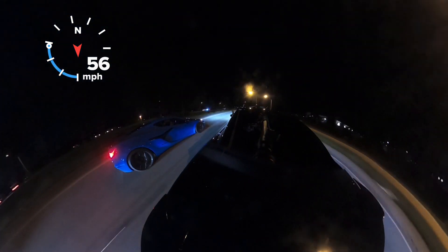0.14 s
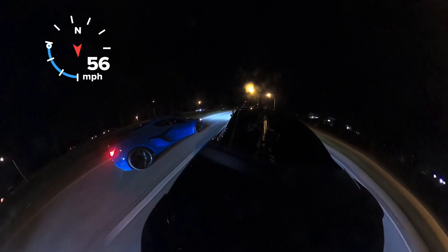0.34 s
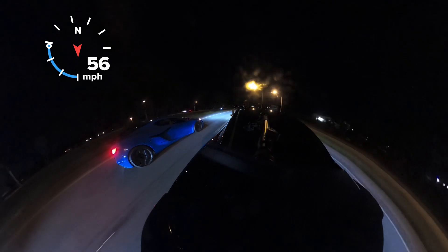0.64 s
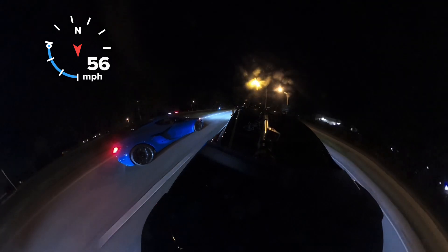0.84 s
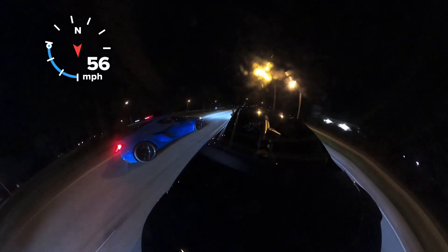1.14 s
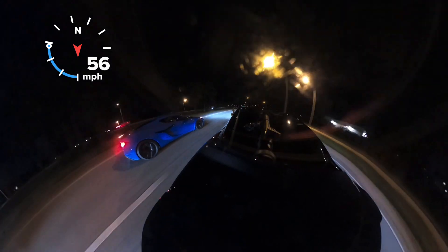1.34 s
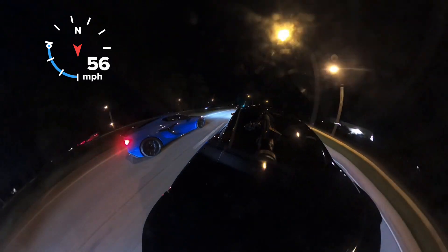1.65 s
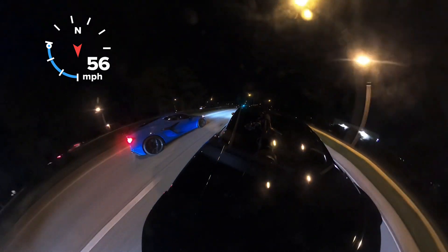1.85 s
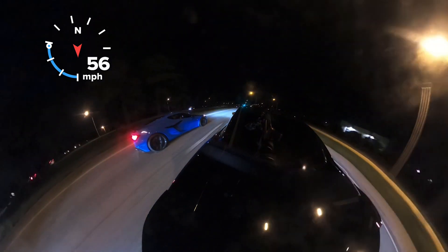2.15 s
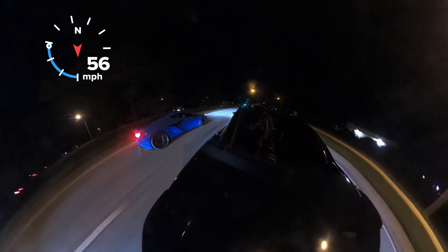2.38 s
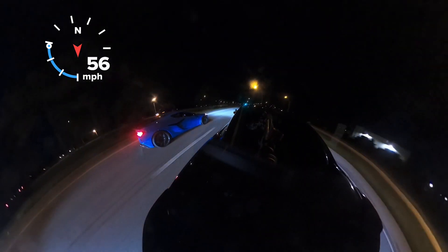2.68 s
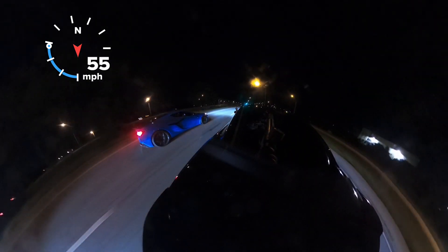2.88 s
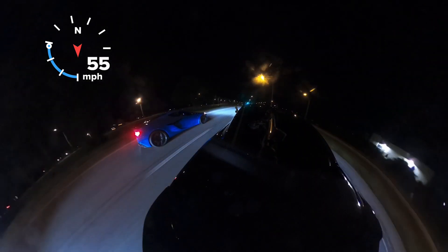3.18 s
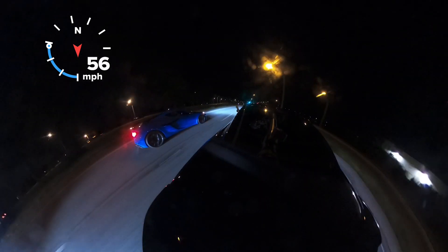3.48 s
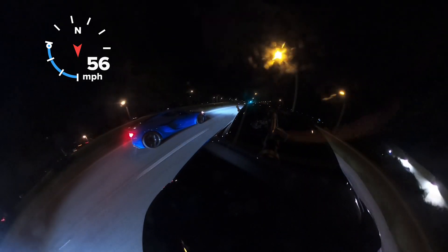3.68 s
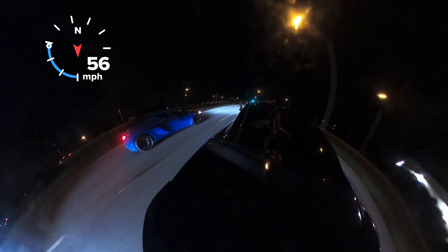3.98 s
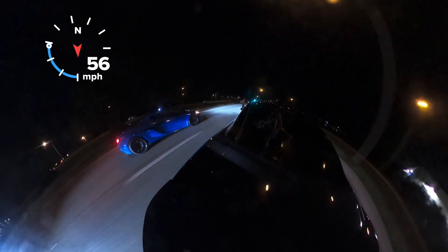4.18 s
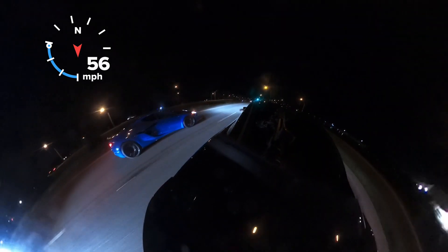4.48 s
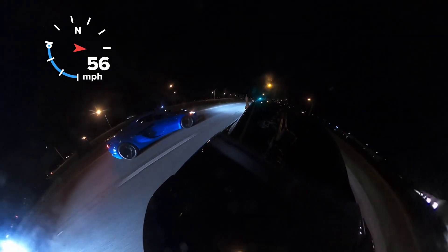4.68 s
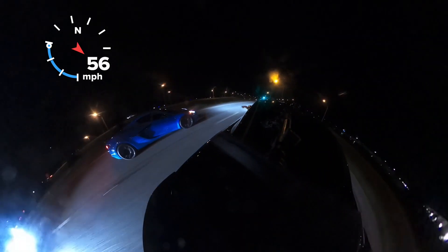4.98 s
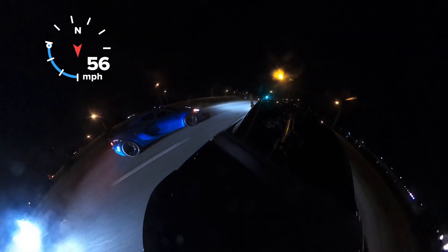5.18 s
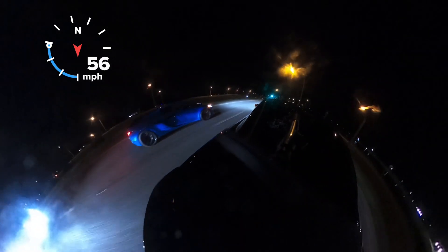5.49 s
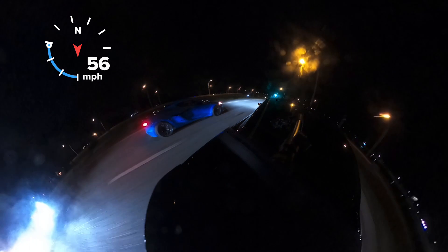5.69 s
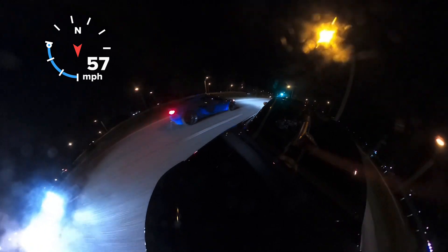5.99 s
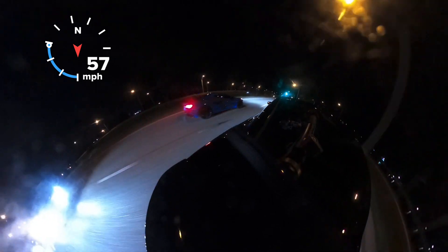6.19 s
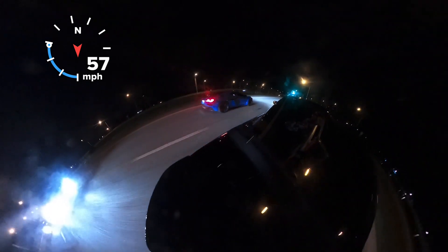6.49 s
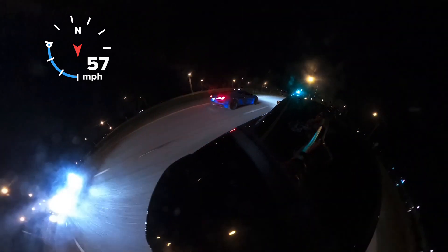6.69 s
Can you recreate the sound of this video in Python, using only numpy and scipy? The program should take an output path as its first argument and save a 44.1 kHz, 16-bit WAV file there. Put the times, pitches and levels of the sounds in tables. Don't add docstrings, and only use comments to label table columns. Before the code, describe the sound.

Gusty highway wind with tearing puffs and slaps, a brief engine blip, a faint held note, then a sports car's loud, raspy V8 acceleration.

```python
import sys
import numpy as np
from scipy import signal
from scipy.fft import rfft, irfft, next_fast_len
from scipy.io import wavfile
from scipy.ndimage import uniform_filter1d

SR = 44100
rng = np.random.default_rng(int(sys.argv[2]) if len(sys.argv) > 2 else 0)


def decibels_to_gain(level_db):
    exponent = np.asarray(level_db, float) / 20
    return 10 ** exponent


def wav_out(sig):
    wavfile.write(sys.argv[1], SR, np.round(np.clip(np.atleast_2d(sig).T, -1, 1) * 32767).astype(np.int16))


N = 301644
THROTTLE_S, CRACK_S = 5.42, 0.07

# frequency_hz, level_db (per Hz)
HISS_COLOUR = [(700, -6.5), (1100, -8), (1600, -11), (2500, -16.5), (3500, -19.5), (5000, -26.5),
               (7000, -36), (8300, -44), (10000, -52), (12000, -61), (14000, -70.5), (15500, -87.5)]


def rms_one(x):
    return x / np.sqrt(np.mean(x ** 2) + 1e-20)


def in_time(rows):
    s, *columns = np.transpose(rows)
    return [np.interp(np.arange(N) / SR, s, c) for c in columns]


def at_hz(points, hz):
    table_hz, table_db = np.transpose(points)
    return np.interp(np.log(hz), np.log(table_hz), table_db)


def ramp(start_s, length_s):
    return np.clip((np.arange(N) / SR - start_s) / length_s, 0, 1)


def bells(events, half_s):
    t = np.arange(0, N / SR + 0.01, 0.002)
    curve_db = sum(db * np.exp(-((t - s) / half_s) ** 2) for s, db in events)
    return np.interp(np.arange(N) / SR, t, curve_db)


def drift(rate, size=N):
    r = np.exp(-32 * np.pi * rate / SR)
    noise = rng.standard_normal(size // 16 + 3002)
    slow = signal.lfilter([1], [1, -2 * r, r * r], noise)[3000:]
    return np.interp(np.arange(size) / 16, np.arange(len(slow)), rms_one(slow))


def coloured(x, spectrum):
    size = next_fast_len(len(x))
    hz = np.maximum(np.arange(size // 2 + 1) * SR / size, 1)
    edge = np.minimum(hz / spectrum[0][0], 1) ** 4 * np.minimum(spectrum[-1][0] / hz, 1) ** 8
    return rms_one(irfft(rfft(x, size) * decibels_to_gain(at_hz(spectrum, hz)) * edge, size)[:len(x)])


def above(x, hz):
    return signal.sosfiltfilt(signal.butter(3, hz, "high", fs=SR, output="sos"), x)


def band_rms(x, low_hz, high_hz):
    band = signal.sosfilt(signal.butter(4, [low_hz, high_hz], "band", fs=SR, output="sos"), x)
    return x / np.sqrt(np.mean(band ** 2))


def note(turns, wobble_db, wobble_turns, rate):
    height, shift = drift(rate, size=len(turns)), drift(rate, size=len(turns))
    return np.sqrt(2) * decibels_to_gain(wobble_db * height) * np.sin(2 * np.pi * (turns + wobble_turns * shift))


def v8_load():
    roar_lag_s, fill_s = 0.018, 0.14
    shut_db = -42 * (1 - ramp(THROTTLE_S, CRACK_S)) ** 2.8
    missing = 1 - ramp(THROTTLE_S + CRACK_S, fill_s)
    swell_db = 1.5 * (ramp(THROTTLE_S, 2.2) * 2 - 0.5)
    exhaust_db = -21 + shut_db - 1.5 * missing + swell_db
    roar_db = -42.5 + np.roll(shut_db, int(roar_lag_s * SR)) + 2 * missing + swell_db
    top_db = 2 - 13 * missing
    return exhaust_db, roar_db, top_db


def v8_orders(turns, cycle_hz):
    # frequency_hz, level_db
    pipe = [(400, -11), (560, -6), (700, -3.5), (900, -5), (1050, -13.5), (1200, -23), (1350, -22.5),
            (1540, -16.5), (1750, -23.5), (2000, -24), (2300, -21), (2700, -27), (3400, -40)]
    # start_s, level_db
    firing = [(5.5, -27), (5.75, -26), (6.0, -22), (6.25, -24.5), (6.5, -25), (6.84, -26)]
    # order (multiple of cycle), level_db, growth_db_per_s
    strong_orders = [(9, -23, -2), (10, -24, 5), (11, -19, -6), (12, -25, 3), (13, -22, 6), (14, -25, 4),
                     (15, -25, 3), (16, -30, -16), (17, -27, 4), (18, -18, 1.5), (19, -21.5, -7),
                     (20, -20.5, -7), (21, -21, 2), (22, -20.5, 0), (23, -28, 1), (24, -29, -2),
                     (25, -23.5, -6), (26, -18, 3), (27, -23, 5), (28, -30, -3), (29, -20.5, -7),
                     (30, -23, -2), (31, -25, 3), (33, -30, -24), (34, -21, 1), (35, -22, 0), (36, -21, 5),
                     (37, -19, -6), (39, -20, 2), (40, -28, -9), (41, -25, 0), (42, -15, -3), (45, -23, -9),
                     (46, -21, 3), (47, -21, -4), (48, -26, -4), (51, -24, -10), (53, -24, -2),
                     (54, -24, -2), (55, -25, -4), (58, -20, -4), (59, -28, -10), (60, -26, 0),
                     (61, -25, -4), (62, -25, -2), (66, -27, -6), (76, -25, -12), (78, -24, -14)]
    strong = {order: (db, growth) for order, db, growth in strong_orders}
    start = int(THROTTLE_S * SR)
    firm_s, mid_pull_s = 5.75, 6.2
    since_s = np.maximum(np.arange(start, N) / SR, firm_s) - mid_pull_s
    unfilled = 1 - ramp(THROTTLE_S + CRACK_S, 0.22)[start:]
    late_db = -4 * unfilled ** 0.5
    blur_db = -5 * unfilled
    bite_s, bite_hz, bite_width_hz = 0.1, 770, 45
    biting = 1 - ramp(THROTTLE_S + CRACK_S + bite_s / 2, bite_s)[start:]
    tones = decibels_to_gain(in_time(firing)[0][start:]) * note(8 * turns, 1.5, 0.04, 5.0)
    for order in range(9, 81):
        hz, lowest_hz = order * cycle_hz, order * cycle_hz.min()
        weak = (-29 + 2 * rng.standard_normal(), -3)
        level_db, growth = strong.get(order, weak)
        lag = (order % 2) / 4 + 0.1 * rng.standard_normal()
        lag = lag + biting * ((0.07 * order ** 2) % 1 - 0.5)
        level_db = level_db + 4.5 * biting * np.exp(-((hz - bite_hz) / bite_width_hz) ** 2)
        level_db = level_db + at_hz(pipe, hz) + growth * since_s
        level_db = level_db + late_db * (lowest_hz < 740 * 0.9) + blur_db * (lowest_hz > 810)
        tones = tones + decibels_to_gain(level_db) * note(order * turns + lag, 1.2, 0.02, 3.0)
    return tones


def v8_roar(turns, top_db, gate=0.46, sharp=0.6):
    # frequency_hz, level_db (per Hz)
    roar_colour = [(300, -8), (650, -3), (950, -6.5), (1230, -16), (1520, -12.5), (1800, -18), (2200, -20),
                   (2500, -23.5), (2800, -24), (3600, -28), (5000, -34), (7500, -38), (8700, -46),
                   (11000, -52), (14500, -74)]
    size = len(turns)
    pulses = (0.5 + 0.5 * np.cos(2 * np.pi * 8 * turns)) ** sharp
    uneven = rms_one(pulses * decibels_to_gain(4 * drift(80.0, size)))
    puffed = 1 - gate + gate * uneven
    roar = band_rms(coloured(rng.standard_normal(size) * puffed, roar_colour), 3000, 9000)
    return roar + (decibels_to_gain(top_db) - 1) * above(roar, 8000)


def v8_pull():
    # start_s, cycle_hz (four-stroke cycles per s)
    speed = [
        (5.455, 31.8),
        (5.53, 34.7),
        (5.68, 34.45),
        (5.824, 35.4),
        (6.006, 37.3),
        (6.138, 38.1),
        (6.402, 40.5),
        (6.76, 43.3),
        (6.84, 43.8),
    ]
    start = int(THROTTLE_S * SR)
    cycle_hz = in_time(speed)[0][start:]
    exhaust_db, roar_db, top_db = (c[start:] for c in v8_load())
    shake = 3 - 2 * ramp(THROTTLE_S, 0.25)[start:]
    turns = np.cumsum(cycle_hz) / SR + 0.001 * drift(12.0, len(cycle_hz)) * shake
    tones, roar = v8_orders(turns, cycle_hz), v8_roar(turns, top_db)
    return np.r_[np.zeros(start), decibels_to_gain(exhaust_db + 18) * tones + decibels_to_gain(roar_db - 1.5) * roar]


def v8_cruise():
    # start_s, pitch_hz, level_db
    blip = [
        (2.9, 210, -50),
        (3.03, 236, -24),
        (3.11, 276, -31),
        (3.18, 299, -23),
        (3.265, 329, -22.5),
        (3.4, 407, -23),
        (3.435, 423, -26),
        (3.5, 425, -50),
    ]
    # start_s, pitch_hz, level_db
    held = [
        (3.6, 253, -50),
        (3.8, 254, -30),
        (4.0, 254, -27),
        (4.55, 256, -28),
        (4.8, 262, -28),
        (5.35, 256, -29),
        (5.42, 250, -25),
        (5.5, 274, -25),
        (5.62, 277, -27),
        (5.7, 277, -50),
    ]
    # multiple (of the firing note), level_db
    held_orders = [(.75, -3), (1., 0)]
    out = 0
    for curve, orders in ((blip, [(0.5, -7), (1, -1.7)]), (held, held_orders)):
        hz, level_db = in_time(curve)
        turns = np.cumsum(hz) / SR
        for k, db in orders:
            out = out + decibels_to_gain(level_db + db) * (level_db > -50) * note(k * turns, 1.5, 0.04, 5.0)
    return out


def own_exhaust():
    # start_s, pitch_hz, level_db
    low_gear = [(4.9, 470, -50), (5.02, 477, -27), (5.12, 476, -28), (5.46, 520, -27), (5.53, 526, -40),
                (5.64, 540, -40), (5.72, 548, -26), (5.88, 540, -25), (5.94, 540, -60)]
    # start_s, pitch_hz, level_db
    high_gear = [(5.94, 462, -60), (6.0, 452, -27), (6.1, 425, -24), (6.2, 410, -27), (6.3, 421, -24),
                 (6.5, 431, -24.5), (6.7, 436, -29), (6.84, 446, -23)]
    # multiple (of that pitch), level_db
    own_orders = [(.5, -2), (1., 0), (1.5, -9)]
    out = 0
    for hz, level_db in (in_time(low_gear), in_time(high_gear)):
        turns = np.cumsum(hz) / SR
        engine = sum(decibels_to_gain(db) * note(k * turns, 2.5, 0.05, 7.0) for k, db in own_orders)
        out = out + decibels_to_gain(level_db) * engine
    return out


def rasp():
    # frequency_hz, level_db (per Hz)
    rasp_colour = [(1000, -15), (1450, -5), (1750, 4), (2100, -2.5), (2700, -26)]
    # centre_s, rise_db
    swells = [(.67, 8), (1.85, 8), (2.68, 11), (2.9, 10), (3.31, 13.5), (3.46, 8.5), (3.9, 8), (4.8, 10.5),
              (5.3, 9)]
    level_db = -57 + bells(swells, half_s=0.09)
    return decibels_to_gain(level_db) * coloured(rng.standard_normal(N), rasp_colour)


def buffet(squeeze=0.5, hold_s=0.035):
    # frequency_hz, level_db (per Hz)
    buffet_colour = [(8.8, -35.5), (15, -8), (59, 0.5), (123, -0.5), (161, -9), (200, -10), (260, -14),
                     (340, -25), (570, -120)]
    # centre_s, rise_db (of the part above 105 Hz)
    lump_changes = [(.2, -1.5), (1.2, -2.5), (1.9, 0.5), (2.4, 1), (3.1, 1.5), (3.5, 4), (3.9, 1),
                    (4.9, -0.5), (5.7, 0), (6.3, 0), (6.7, 2)]
    lumps = coloured(rng.standard_normal(N), buffet_colour)
    small, shift_db = above(lumps, 105), bells(lump_changes, half_s=0.2)
    lumps = small * decibels_to_gain(shift_db) + (lumps - small) * decibels_to_gain(-0.4 * shift_db)
    height = np.sqrt(uniform_filter1d(lumps ** 2, int(hold_s * SR)) + 0.05)
    return decibels_to_gain(-13.5 + drift(9.9)) * rms_one(lumps / height ** squeeze)


def stream(gust_db=0.5, eddy_db=3.0, rush_share=0.14, fine_db=2.0):
    # frequency_hz, level_db (per Hz)
    rush_colour = [(100, -25.5), (170, -3.5), (274, -6.5), (307, -0.5), (340, -5.5), (443, -7.5),
                   (554, -11.5), (669, -12), (1600, -30), (2080, -63.5), (3520, -120)]
    # start_s, level_db
    gust = [(0.04, -49), (0.19, -49), (0.91, -51.5), (1.34, -51), (1.46, -50.5), (1.9, -50.5), (2.77, -54),
            (3.68, -50.5), (3.83, -50.5), (4.1, -50), (4.42, -53), (4.86, -49.5), (5.21, -49.5),
            (5.42, -50)]
    # centre_s, rise_db
    eddies = [(.1, 1), (.35, 2.5), (.5, -0.5), (.78, 0.5), (1.4, 1.5), (1.58, -1.5), (1.85, 3.5),
              (2.24, -3.5), (2.47, 2.5), (2.58, -2), (2.68, 4.5), (2.79, -1.5), (2.88, 2.5), (2.99, 1.5),
              (3.1, 4.5), (3.21, -0.5), (3.32, 1), (3.45, 2.5), (3.57, -3), (3.88, 0.5), (4.25, -0.5),
              (4.35, -1.5), (4.48, -1), (4.58, 2.5), (4.8, 2), (5.13, -2)]
    # centre_s, rise_db
    wake = [(.5, -3.5), (1.05, 3), (1.35, 2.5), (2.4, -1), (3.4, 2.5), (3.8, 3), (4.15, 1), (4.85, -2),
            (5.3, -2.5)]
    # start_s, level_db
    duck = [(5.44, 0), (5.56, -3.5)]
    large_db = bells(eddies, half_s=0.039)
    hiss_db = in_time(gust)[0] + large_db
    nearing_db = 0.63 * THROTTLE_S * ramp(0, THROTTLE_S)
    rush_db = -27 + nearing_db + 0.55 * (hiss_db - hiss_db.mean()) + in_time(duck)[0]
    eddies_db = gust_db * drift(11.0) + eddy_db * drift(99.0)

    rush = coloured(rng.standard_normal(N) * decibels_to_gain(rush_share * eddies_db), rush_colour)
    rush = rush + (rush - above(rush, 380)) * (decibels_to_gain(bells(wake, half_s=0.18)) - 1)

    white = rng.standard_normal(N)
    other_db = 0.7 * eddies_db + 0.6 * np.roll(eddies_db, N // 3)
    hiss = coloured(white * decibels_to_gain(eddies_db), HISS_COLOUR)
    other = coloured(white * decibels_to_gain(other_db), HISS_COLOUR)
    hiss = hiss + above(other - hiss, 2900)
    fine = above(hiss, 4700)
    hiss = hiss - fine + fine * decibels_to_gain(0.5 * fine_db * drift(25.0) - 0.5 * large_db - 1.0)
    hiss = hiss + above(hiss, 11500) * (decibels_to_gain(8.8 * drift(12.0) - 3.0) - 1)
    return decibels_to_gain(rush_db + 2.0) * band_rms(rush, 200, 900) + decibels_to_gain(hiss_db + 2.5) * band_rms(hiss, 2140, 8000)


def puffs(length_s=0.0025, trim_db=-4, follows=0.75):
    # start_s, peak_db, top_db (share above 5 kHz)
    strong_tears = [(0.0414, -26, -15), (0.17, -40, -24), (0.207, -37, -23), (0.2377, -30, -20),
                    (0.3406, -26, -17), (0.499, -29, -19), (0.535, -31, -24), (0.654, -28.5, -22),
                    (0.6739, -36, -24), (0.688, -33, -27), (1.1655, -29.5, -22), (1.2116, -36, -22),
                    (1.4556, -28.5, -29), (1.541, -36, -18), (1.7135, -38, -23), (1.7674, -34, -28),
                    (1.8143, -29, -22), (1.9255, -36, -23), (1.9443, -32, -27), (2.141, -32, -24),
                    (2.1884, -35, -23), (2.247, -36, -25), (2.317, -30, -20), (2.4503, -37, -20),
                    (2.4843, -25.5, -24), (2.617, -32, -22), (2.6494, -33, -22), (2.759, -30.5, -21),
                    (2.8022, -34, -24), (2.8534, -30, -24), (2.871, -28, -28), (2.9746, -32.5, -23),
                    (3.0315, -37, -21), (3.0954, -34, -22), (3.1557, -31.5, -22), (3.4131, -31.5, -21),
                    (3.9789, -32, -23), (4.0883, -31, -21), (4.129, -30, -18), (4.1674, -30, -22),
                    (4.341, -28.5, -16.5), (4.3894, -28, -21), (4.4318, -36, -26), (4.5484, -29, -22),
                    (4.5705, -31, -21), (4.6039, -30, -22), (4.6985, -37, -17), (4.7511, -36, -22),
                    (4.7674, -35, -17), (4.8032, -25, -12), (4.8663, -35, -24), (4.8827, -27, -19),
                    (4.9284, -28, -18), (4.9658, -27, -21), (5.0134, -28, -19), (5.0809, -29, -22),
                    (5.223, -26, -28), (5.2598, -28, -24), (5.3034, -34, -18), (5.3204, -27.5, -14)]
    usual_top_db, small_count = -22, 60
    chance = rng.random((small_count, 2))
    small_s = chance[:, 0] * THROTTLE_S
    small_db = -39.5 + 3 * (2 * chance[:, 1] - 1)
    small = np.c_[small_s, small_db, np.full(small_count, usual_top_db)]
    marks = np.zeros((2, N))
    for s, peak_db, top_db in [*small, *strong_tears]:
        brighter_db = np.array([0, follows * (top_db - usual_top_db)])
        marks[:, round(s * SR)] = decibels_to_gain(peak_db + trim_db + brighter_db)
    low, high = (np.convolve(m, np.hanning(int(2 * length_s * SR)))[:N] for m in marks)
    hiss = band_rms(coloured(rng.standard_normal(N), HISS_COLOUR), 1400, 8000)
    top = above(hiss, 4500)
    tears = low * (hiss - top) + high * top
    return tears - 0.95 * above(tears, 7600)


def flaps():
    # start_s, peak_db
    slaps = [(0.16, -17), (1.086, -19.5), (1.128, -19.5), (1.298, -17), (1.928, -18.5), (2.053, -19),
             (2.312, -20), (2.367, -17.5), (2.484, -18), (2.544, -21.5), (4.007, -19)]
    pitch_hz, t60_s, trim_db = 570, 0.02, -3
    t, out = np.arange(int(2 * t60_s * SR)) / SR, np.zeros(N)
    for (s, peak_db), spread in zip(slaps, rng.uniform(0.8, 1.25, len(slaps))):
        at = round(s * SR)
        decay = decibels_to_gain(peak_db + trim_db - 60 * t / t60_s)
        out[at:at + len(t)] += decay * np.sin(2 * np.pi * pitch_hz * spread * t)
    return 2 * signal.sosfilt(signal.butter(4, 1100, fs=SR, output="sos"), out)


def scene():
    cars = v8_pull() + v8_cruise() + own_exhaust() + rasp()
    wind = buffet() + stream() + puffs() + flaps()
    return (cars + wind)[None]


def roll_off(x):
    return signal.sosfilt(signal.butter(12, 15150, fs=SR, output="sos"), x)


def record(dry):
    top = 1.05
    mix = top * np.tanh(dry / top)
    return roll_off(mix)


dry = scene()
out = record(dry)
wav_out(out)
```